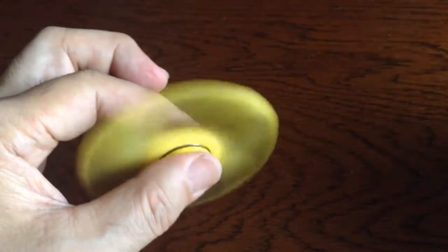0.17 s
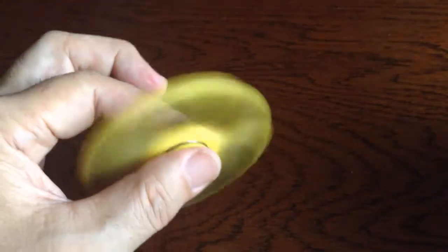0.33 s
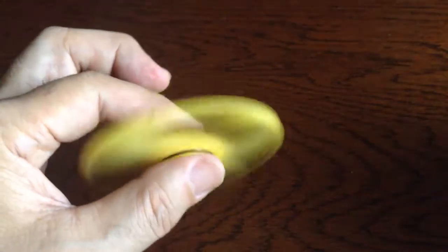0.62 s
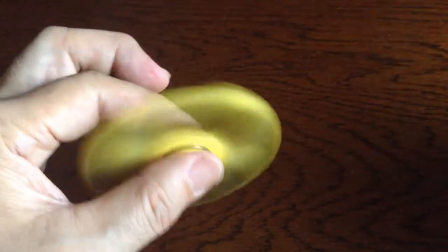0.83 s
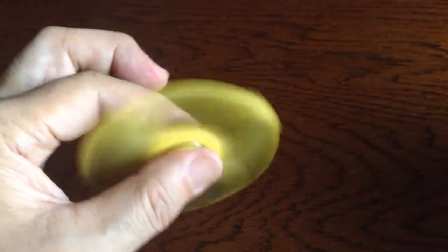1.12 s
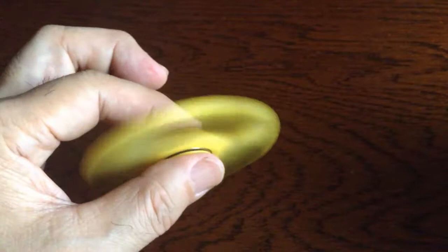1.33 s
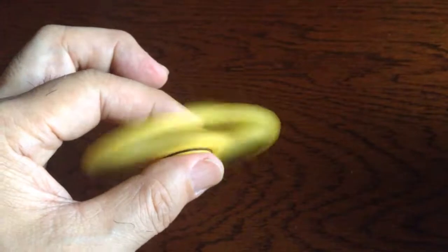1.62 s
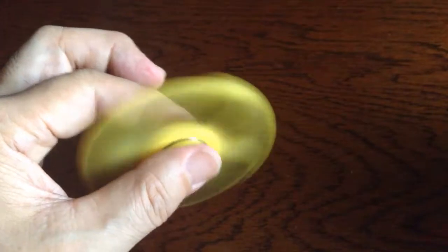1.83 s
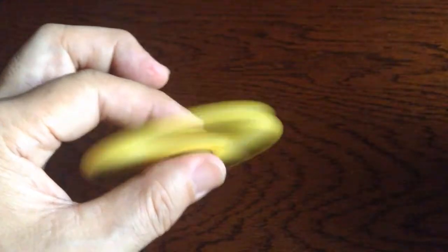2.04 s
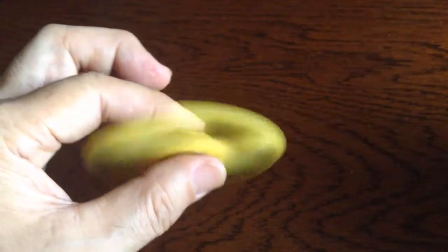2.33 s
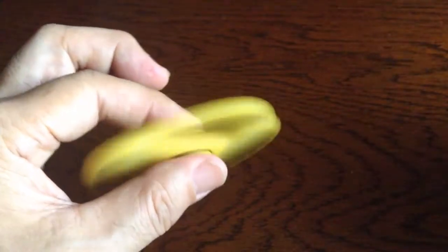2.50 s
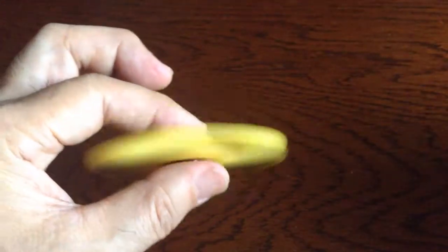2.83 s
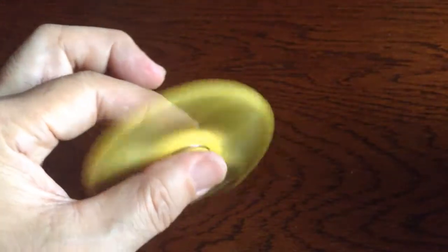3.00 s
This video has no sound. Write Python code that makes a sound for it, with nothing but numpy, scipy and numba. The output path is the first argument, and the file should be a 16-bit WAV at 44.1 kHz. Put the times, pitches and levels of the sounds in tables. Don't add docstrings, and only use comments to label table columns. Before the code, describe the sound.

A finger spinner whirs with a thin, bright metallic hiss and a fine irregular ticking rattle.

```python
import sys
import numpy as np
from scipy import signal
from scipy.fft import rfft, irfft
from scipy.io import wavfile
from scipy.ndimage import uniform_filter1d
from numba import njit

SR = 44100
rng = np.random.default_rng(int(sys.argv[2]) if len(sys.argv) > 2 else 0)


def level_to_linear(level):
    exponent = np.asarray(level, float) / 20
    return 10 ** exponent


def materialize(psi):
    bounded = np.clip(np.atleast_2d(psi).T, -1, 1)
    quanta = np.round(bounded * 32767).astype(np.int16)
    wavfile.write(sys.argv[1], SR, quanta)


N = 139356

# time in seconds, bearing load in dB, tilt of the body toward the
# microphone in dB, looseness of the grip in dB.
HAND = [
    (0.0, -48, 0, 0.5),
    (0.8, -47.5, -2.5, 1),
    (1.6, -49.5, -1.5, 3.5),
    (1.8, -48.5, 0, 0.5),
    (2.45, -50, 1, 1.5),
    (3.16, -49.5, -3, -2),
]
# swings per turn, depth in dB, phase in radians.
THROB = [
    (1., -0.3, 0.31),
    (2.0, 2, -1.8),
]

# centre in Hz, width in Hz, level in dB.
RACE_MODES = [(12200, 260, -9), (12700, 500, -13), (13250, 300, 0), (14100, 900, -14), (15000, 450, -7)]
# centre in Hz, width in Hz, level in dB.
BODY_MODES = [(4840, 97, 2), (5170, 780, -4), (6095, 183, 2.5), (6500, 110, -8.5), (6700, 520, -1),
              (7290, 56, 1), (7720, 26, -3.5), (7640, 34, -2.5), (8110, 140, -3), (7700, 400, 1.5),
              (8630, 720, -3), (8500, 150, -15), (9370, 1500, -14), (10280, 1200, -6.5)]
# centre in Hz, width in Hz, level in dB.
LOBE_MODES = [(2440, 410, -12), (2626, 107, 3), (3370, 850, 0.5)]
# centre in Hz, width in Hz, level in dB.
CAP_MODES = [(1445, 27, -2), (1557, 40, 2.5), (1804, 88, -2.5)]
# centre in Hz, width in Hz, depth 0-1, drift in Hz.
SHADOWS = [(4330, 350, .68, 60), (6420, 200, .75, 60), (9300, 200, .3, 250), (11320, 1000, .68, 130)]

# time in seconds, strength in dB, share in the body in dB.
KNOCKS = [(0.0696, -31, -4), (0.1092, -34, -4), (0.155, -35, -16), (0.196, -46, -25), (0.2753, -34, -20),
          (0.3368, -40, -17), (0.3555, -32.5, -18), (0.4055, -30, -15), (0.4402, -35, -10),
          (0.4633, -31, -18), (0.4948, -27, -11), (0.539, -34, -13), (0.5807, -40, -10), (0.5975, -38, -18),
          (0.62, -28, -19), (0.639, -52, -8), (0.677, -30, -31), (0.6958, -30, -10), (0.762, -42, -23),
          (0.786, -41.5, -18), (0.858, -37, -10), (0.874, -37, -14), (0.933, -30, -16), (0.9802, -31, -18),
          (0.998, -35, -11), (1.0944, -37, -6), (1.1204, -41, -26), (1.1413, -38, 5), (1.1581, -36.5, -14),
          (1.2143, -32, -22), (1.262, -40, -10), (1.3254, -40, -14), (1.3585, -40, -9), (1.411, -37, -11),
          (1.444, -32, -17), (1.465, -39, -13), (1.504, -46, -21), (1.7424, -54, -19), (1.7576, -41, -18),
          (1.8, -36, -15), (1.8697, -35.5, -23), (1.922, -29, -18), (2.0358, -38, -9), (2.097, -37, -7),
          (2.252, -42, -5), (2.3103, -35, -13), (2.3437, -26, -13), (2.407, -33.5, -16), (2.43, -35, -10),
          (2.53, -44, -28), (2.573, -37, -11), (2.6357, -34, -13), (2.6843, -28, -25), (2.713, -36, -14),
          (2.746, -30, -25), (2.8973, -35, -11), (2.934, -47, -15), (3.0245, -33, -7), (3.049, -41, -12),
          (3.1023, -47, -26)]
# time in seconds, strength in dB, share in the
# lobes in dB.
THUDS = [(0.0573, -38, -10), (0.0996, -26, 0), (0.139, -39, 12), (0.354, -54, 12), (0.4943, -60, -12),
         (0.5402, -81, -4), (0.6374, -58, -7), (0.8774, -39, -18), (1.03, -36, -20), (1.139, -59, 3),
         (1.2493, -36, -8), (1.363, -32, 4), (1.3972, -37.5, -11), (1.464, -42, -6), (1.596, -41.5, -9),
         (1.7, -46, -11), (1.8428, -26.5, -1), (1.9225, -52, 2), (2.026, -47, -15), (2.076, -32, -1),
         (2.23, -37.5, 12), (2.3072, -40, 12), (2.3436, -60, -6), (2.4528, -50, -3), (2.52, -30, 7),
         (2.55, -37, -15), (2.613, -37, 1), (2.6593, -50, -3), (2.816, -39, -12), (2.8985, -40, -13)]
# time in seconds, strength in dB.
CHATTER = [(0.153, -69), (0.429, -69), (0.519, -73), (0.788, -69), (0.846, -77), (0.9327, -61),
           (1.1378, -73), (1.2181, -77), (1.7549, -74), (2.1575, -62), (2.3116, -69), (2.6594, -83),
           (2.721, -70), (2.914, -79), (3.101, -70)]

# start in seconds, length in seconds, level in dB.
RACE_RUNS = [(0.066, 0.043, -48), (0.141, 0.034, -46.5), (0.27, 0.026, -47.5), (0.34, 0.046, -46.5),
             (0.398, 0.062, -47.5), (0.474, 0.033, -44), (0.524, 0.052, -42.5), (0.63, 0.038, -47),
             (0.692, 0.02, -49.5), (0.777, 0.042, -52), (0.869, 0.04, -46), (0.994, 0.044, -46),
             (1.133, 0.071, -46.5), (1.347, 0.076, -50), (1.747, 0.04, -46.5), (1.798, 0.021, -41),
             (1.875, 0.041, -45), (1.917, 0.03, -46.5), (1.931, 0.059, -46), (2.173, 0.033, -52),
             (2.227, 0.063, -45), (2.525, 0.027, -44), (2.662, 0.051, -45), (2.711, 0.035, -48.5),
             (3.04, 0.026, -46.5), (3.094, 0.041, -46)]
# start in seconds, length in seconds, level in dB.
BODY_RUNS = [
    (0.061, 0.069, -51.5),
    (0.132, 0.035, -59),
    (0.35, 0.042, -45.5),
    (0.623, 0.094, -54.5),
    (2.501, 0.051, -56.5),
    (2.552, 0.044, -52),
    (2.605, 0.03, -59),
    (2.88, 0.041, -49),
]
# start in seconds, length in seconds, level in dB.
LOBE_RUNS = [(-0.001, 0.05, -66), (0.04, 0.17, -59), (0.187, 0.021, -65), (0.312, 0.067, -72.5),
             (0.406, 0.037, -63), (0.643, 0.078, -61), (0.772, 0.033, -57.5), (0.85, 0.011, -67),
             (0.938, 0.022, -67), (0.968, 0.02, -68), (1.049, 0.033, -64.5), (1.125, 0.023, -67.5),
             (1.253, 0.029, -75), (1.36, 0.025, -71), (1.55, 0.037, -64), (1.648, 0.022, -75),
             (1.74, 0.058, -65), (1.827, 0.034, -68), (2.14, 0.039, -63.5), (2.223, 0.065, -66.5),
             (2.449, 0.049, -70), (2.557, 0.058, -64), (2.891, 0.034, -66.5), (2.981, 0.087, -59.5),
             (3.11, 0.023, -60.5)]
# start in seconds, length in seconds, level in dB.
CAP_RUNS = [
    (.78, 0.13, -46.5),
    (1.02, 0.2, -47.5),
    (2.62, 0.11, -49.5),
]

# time in seconds, strength in dB.
RIM_FLECKS = [(0.0892, -45), (0.2708, -64), (0.3696, -63), (0.4554, -54), (0.5806, -52), (0.8634, -51),
              (0.9542, -62), (1.796, -66), (2.078, -50), (2.2323, -59), (2.3456, -67), (2.5287, -58),
              (2.6505, -50)]
# time in seconds, strength in dB.
HUB_FLECKS = [
    (1.6531, -63),
    (1.7529, -55),
    (1.9492, -51),
    (2.1071, -60),
    (2.8973, -69),
    (2.988, -56.5),
]

# frequency in Hz, density in dB per Hz.
HUSH = [(30, -51), (60, -30), (100, -14.5), (200, -1.5), (430, -9), (1200, -13), (4000, -15),
        (15000, -19.5)]
# centre in Hz, width in Hz, level in dB.
HUM = [(95, 6.2, -102), (214, 94, -90), (516.4, 5.1, -98)]
# frequency in Hz, threshold in dB under the mean level.
WEAK = [(3500, -27), (4300, -20), (6000, -14), (9000, -10.5), (11000, -11.5), (11600, -12), (15000, -9)]


def spinner():
    hand = np.array(HAND).T
    load_db, tilt_db, grip_db = (np.interp(np.arange(N) / SR, hand[0], column) for column in hand[1:])
    load, impacts = level_to_linear(load_db), patter()
    race_knock, body_knock = knocks()
    out = (races(load, impacts, race_knock) + body(load, tilt_db, impacts, body_knock)
           + lobes(load, grip_db, impacts, body_knock) + caps(load, impacts, body_knock))
    for hz, width_hz, depth, drift_hz in SHADOWS:
        out = out - depth * drift_ring(out, hz + drift_hz * walk(14), width_hz)
    return out * np.sqrt(np.mean(load ** 2))


def patter():
    hit = rng.random(N) < 1500 / SR
    size_db = np.minimum(3.5 * rng.exponential(size=N), 10)
    return level(hit * rng.choice([-1, 1], N) * level_to_linear(size_db), 0)


def knocks():
    times, strength_db, body_db = np.array(KNOCKS).T
    strength_db = strength_db - 4.5
    length_s, body_gain_db = 0.0019, 6
    crack = rng.choice([-1, 1], N)
    race_knock = crack * bursts(times, strength_db, length_s)
    body_knock = crack * bursts(times, strength_db + body_db + body_gain_db, length_s)
    return race_knock, body_knock


def races(load, impacts, knock):
    env = (0.78 * load + runs(RACE_RUNS, -6.5)) * level_to_linear(2.4 * walk(150))
    sound = mode_bank(impacts, env, knock, RACE_MODES, own=1.1, patchy_db=1.1, patchy_hz=89.8, floor_hz=12030)
    return level(sound, -0.5)


def body(load, tilt_db, impacts, knock):
    t = np.arange(N) / SR
    spin_hz, sag_hz_per_s = 11.39, .78
    turn = 2 * np.pi * (spin_hz * t - sag_hz_per_s * t ** 2 / 2)
    throb_db = sum(db * np.cos(swings * turn + phase) for swings, db, phase in THROB)
    env = 0.7 * load * level_to_linear(tilt_db + 0.8 * throb_db) + runs(BODY_RUNS, 0)
    env = env * level_to_linear(0.49 * walk(70))
    times, strength_db, _ = np.array(THUDS).T
    env = limited(env + bursts(times, strength_db - 9.5, 0.0041))
    sound = mode_bank(impacts, env, knock, BODY_MODES, own=2.0, patchy_db=3.0, patchy_hz=60.17, floor_hz=4110)
    return level(sound, -7)


def lobes(load, grip_db, impacts, knock):
    env = 0.88 * load * level_to_linear(grip_db) + runs(LOBE_RUNS, 16)
    env = env * level_to_linear(2.26 * walk(90))
    times, strength_db, lobe_db = np.array(THUDS).T
    env = limited(env + bursts(times, strength_db + lobe_db - 12, 0.0041))
    sound = mode_bank(impacts, env, 0.51 * knock, LOBE_MODES, own=1.2, patchy_db=3.0, patchy_hz=85.43,
                      floor_hz=1890)
    return level(sound, -19)


def caps(load, impacts, knock):
    times, strength_db = np.array(CHATTER).T
    env = 0.61 * load + runs(CAP_RUNS, 0) + bursts(times, strength_db + 26, 0.0077)
    sound = mode_bank(impacts, env, 0.34 * knock, CAP_MODES, own=1.5, patchy_db=2.5, patchy_hz=15,
                      floor_hz=1330)
    return level(sound, -33.5)


def mode_bank(impacts, env, knock, modes, own, patchy_db, patchy_hz, floor_hz):
    total = 0
    for k, (hz, width_hz, db) in enumerate(modes):
        drive = (impacts + own * np.roll(impacts, rng.integers(N))) / np.hypot(1, own)
        rolling = drive * env * level_to_linear(patchy_db * walk(patchy_hz))
        struck = knock * level_to_linear(walk(patchy_hz))
        total = total + (-1) ** k * level_to_linear(db) * ring(rolling + struck, hz, width_hz)
    return signal.sosfilt(signal.butter(4, floor_hz, "high", fs=SR, output="sos"), total)


def limited(env):
    top = level_to_linear(8) * np.median(env)
    return top * np.tanh(env / top)


def ring(x, hz, width_hz):
    return signal.lfilter(*signal.iirpeak(min(hz, .45 * SR), hz / width_hz, SR), x)


@njit
def drift_ring(x, hz, width_hz):
    y, band, low = np.empty(len(x)), 0., 0.
    for i in range(len(x)):
        g, damping = np.tan(np.pi * hz[i] / SR), width_hz / hz[i]
        v = (band + g * (x[i] - low)) / (1 + g * (g + damping))
        band, low, y[i] = 2 * v - band, low + 2 * g * v, damping * v
    return y


def bursts(times, dbs, length_s):
    t, env = np.arange(N) / SR, np.zeros(N)
    for s, db in zip(times, dbs):
        near = slice(max(int((s - .05) * SR), 0), int((s + .1) * SR))
        since = (t[near] - s) / length_s
        shape = np.where(since > .5, since - .5, 2 * since - 1)
        env[near] += level_to_linear(db) * np.exp(-shape ** 2)
    return env


def runs(table, offset_db):
    env = np.zeros(N)
    for s, length_s, db in table:
        near = np.arange(max(int(s * SR), 0), min(int((s + length_s) * SR), N))
        phase = np.pi * np.clip((near / SR - s) / length_s, 0, 1)
        env[near] += level_to_linear(db + offset_db) * np.sin(phase)
    return env


def walk(rate_hz):
    hold = max(int(SR / rate_hz), 2)
    steps = rng.standard_normal(4000)[np.arange(N + hold) // hold]
    w = uniform_filter1d(uniform_filter1d(steps, hold), hold)[:N]
    return (w - w.mean()) / w.std()


def level(x, db):
    return x * level_to_linear(db) / np.sqrt(np.mean(x ** 2))


def flecks(table, hz):
    times, dbs = np.array(table).T
    scrape = level(ring(rng.standard_normal(N), hz, 100), 0)
    return scrape * bursts(times, dbs - 5, 0.0079)


def thump():
    time_s, hz, db, length_s = .665, 215, -70, .02
    return bursts([time_s], [db], length_s) * np.sin(2 * np.pi * hz * np.arange(N) / SR)


def room():
    hz, table = np.fft.rfftfreq(N, 1 / SR) + 1, np.array(HUSH).T
    shape_db = np.interp(np.log(hz), np.log(table[0]), table[1])
    hush = irfft(rfft(rng.standard_normal(N)) * level_to_linear(shape_db), N)
    hush = level(hush, -75) * level_to_linear(0.24 * walk(3.38))
    hum = sum(level(ring(rng.standard_normal(N), f, width_hz), db) for f, width_hz, db in HUM)
    swell = runs([(.6, .5, 5)], -6)
    return hush + hum * (1 + swell)


def scene():
    scrapes = flecks(RIM_FLECKS, 6120) + flecks(HUB_FLECKS, 4765)
    return (spinner() + scrapes + thump() + room())[None]


def drop_weak(x):
    hz, _, z = signal.stft(x, SR, nperseg=2048, noverlap=1536)
    power, table = uniform_filter1d(np.abs(z) ** 2, size=4, axis=2), np.array(WEAK).T
    limit = level_to_linear(np.interp(hz, table[0], table[1], left=-200)) ** 2
    mean_power = power.mean(axis=1, keepdims=True)
    weak = uniform_filter1d(power, size=3, axis=1) < limit[:, None] * mean_power
    return signal.istft(z * np.where(weak, .03, 1), SR, nperseg=2048, noverlap=1536)[1][:, :N]


def low_pass(x):
    return signal.sosfilt(signal.butter(12, 16620, fs=SR, output="sos"), x)


def record(dry):
    top_hz = 15300
    cut = signal.sosfilt(signal.ellip(8, .3, 30, top_hz, fs=SR, output="sos"), drop_weak(dry))
    cut = signal.sosfilt(signal.cheby1(12, .1, top_hz + 140, fs=SR, output="sos"), cut)
    return low_pass(cut)


dry = scene()
out = record(dry)
materialize(out)
```